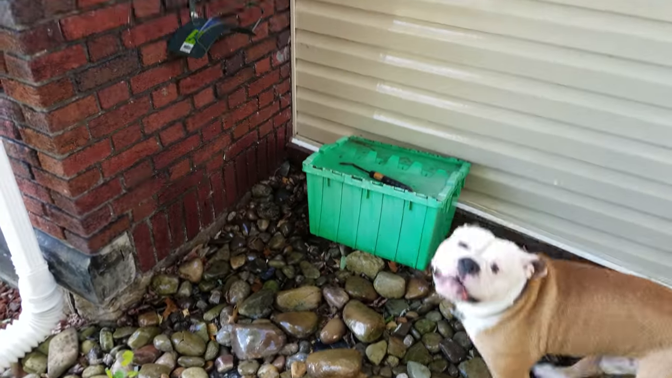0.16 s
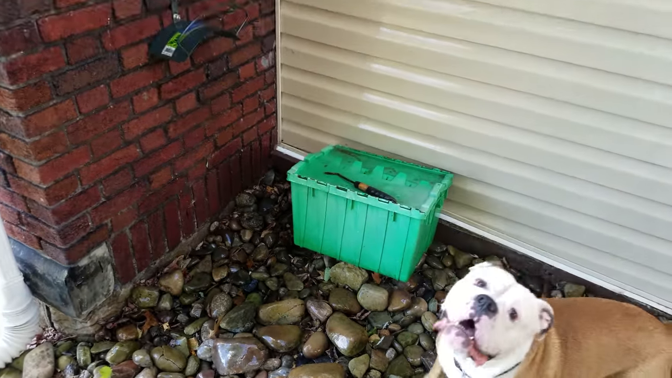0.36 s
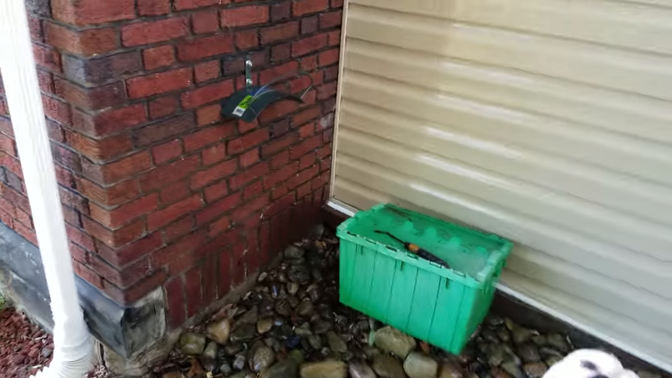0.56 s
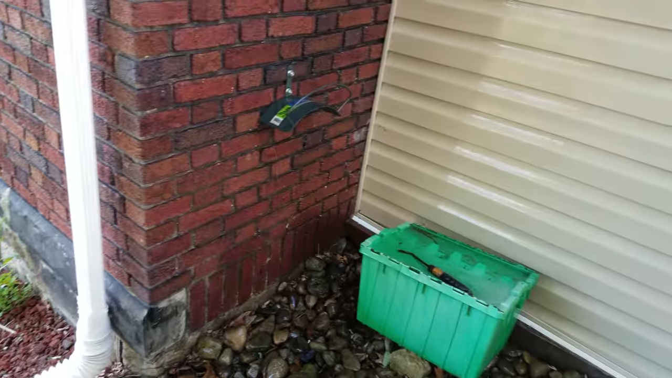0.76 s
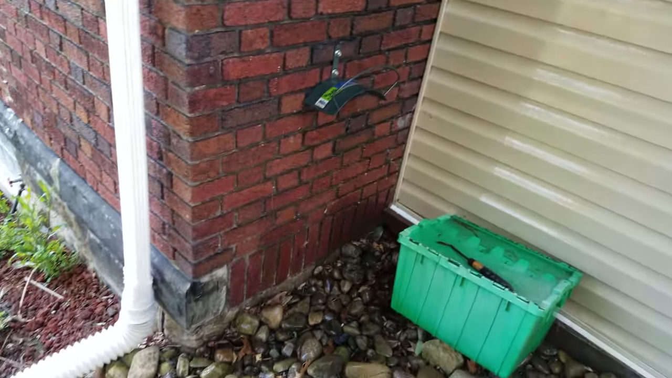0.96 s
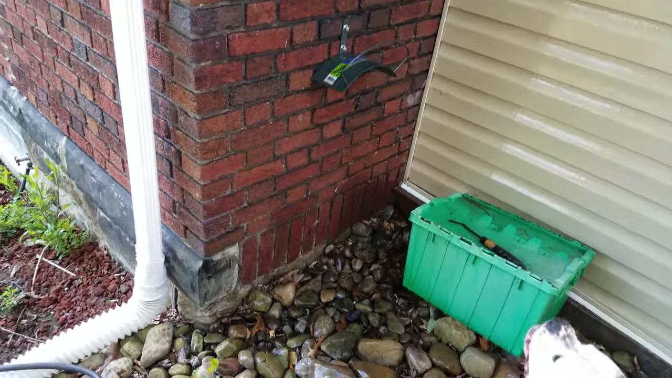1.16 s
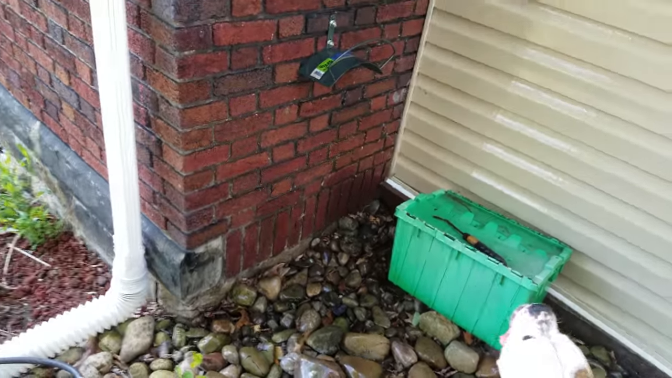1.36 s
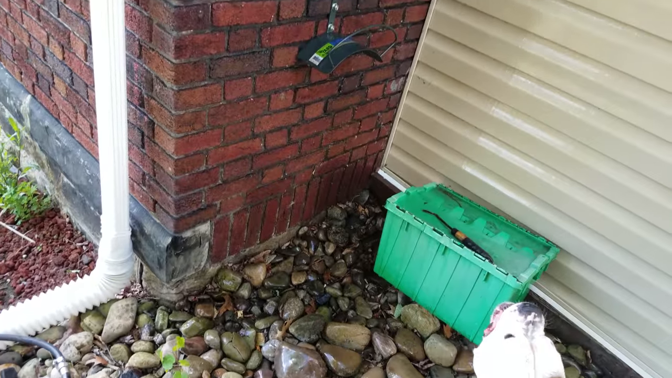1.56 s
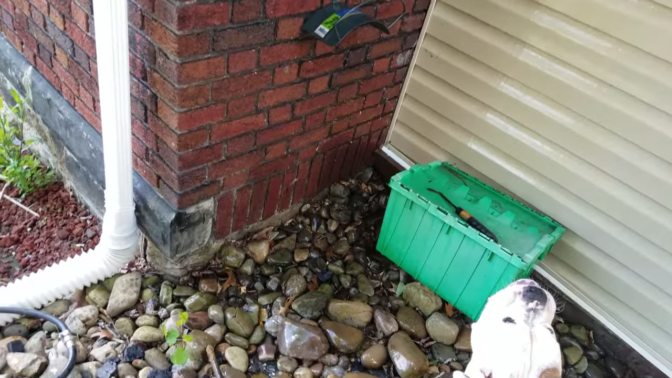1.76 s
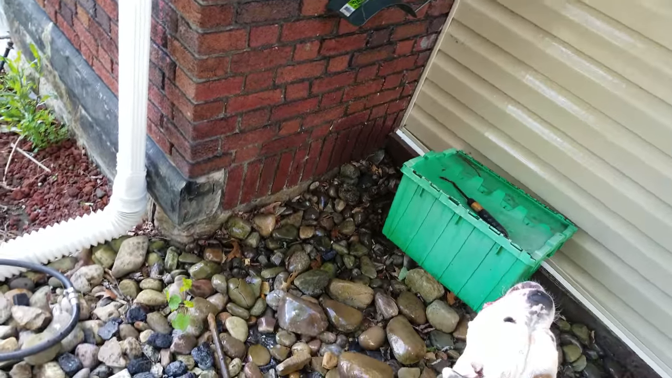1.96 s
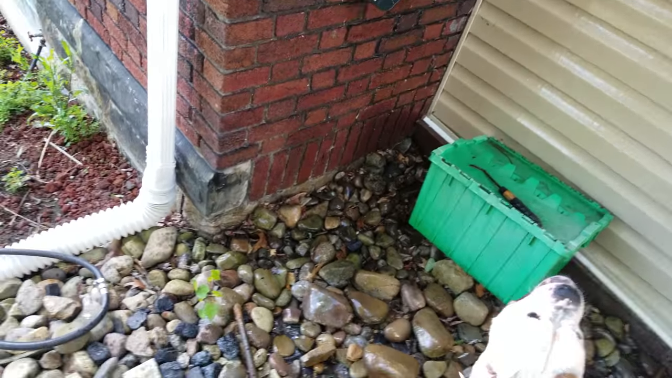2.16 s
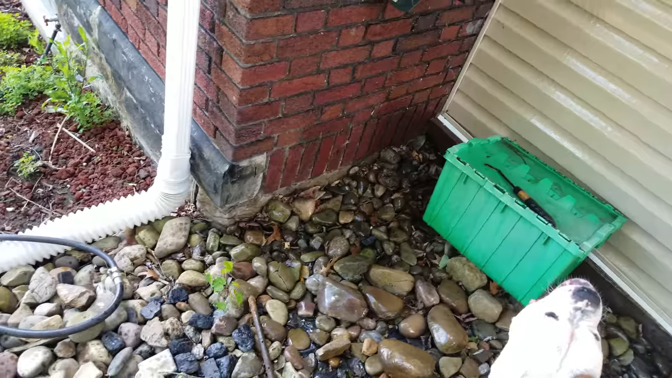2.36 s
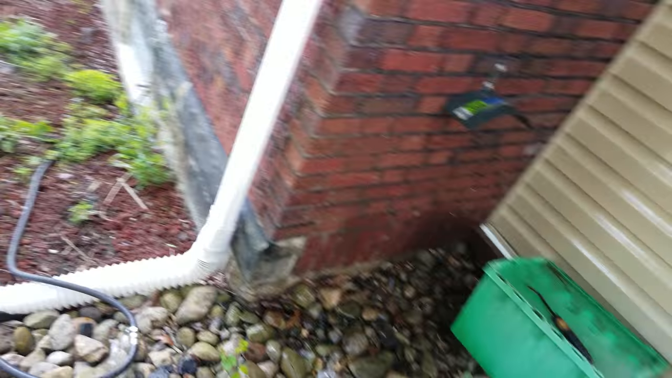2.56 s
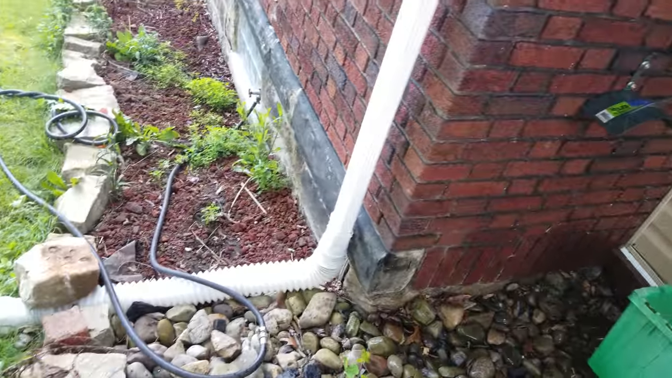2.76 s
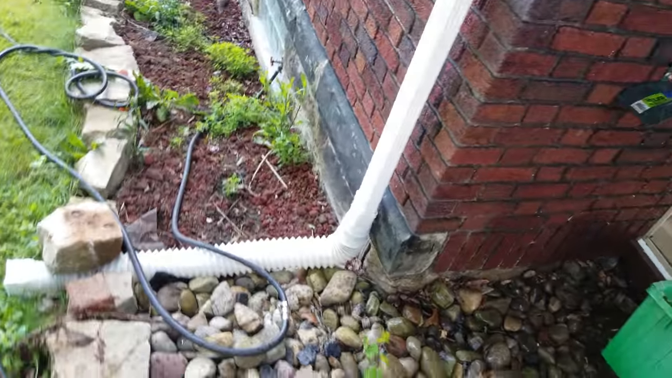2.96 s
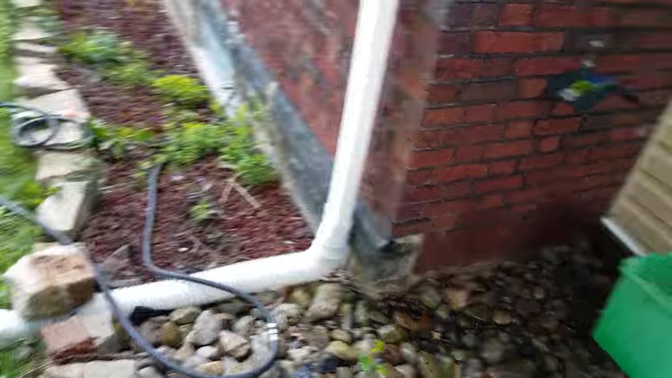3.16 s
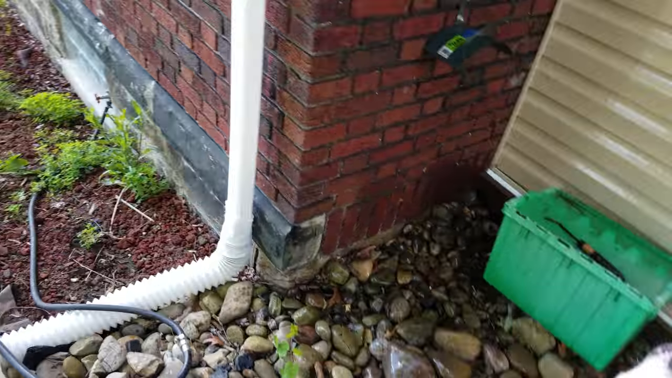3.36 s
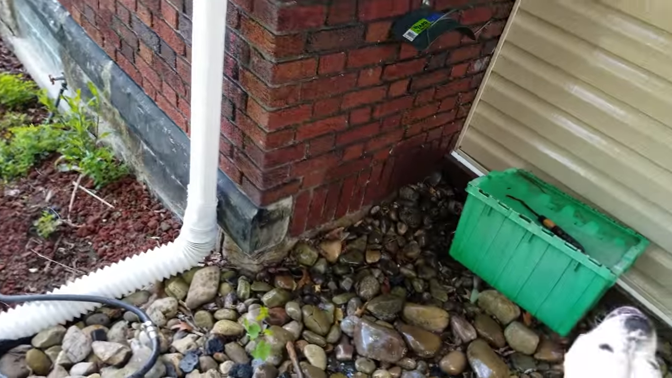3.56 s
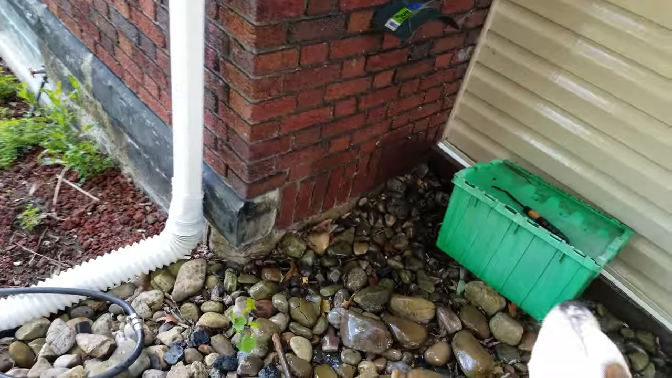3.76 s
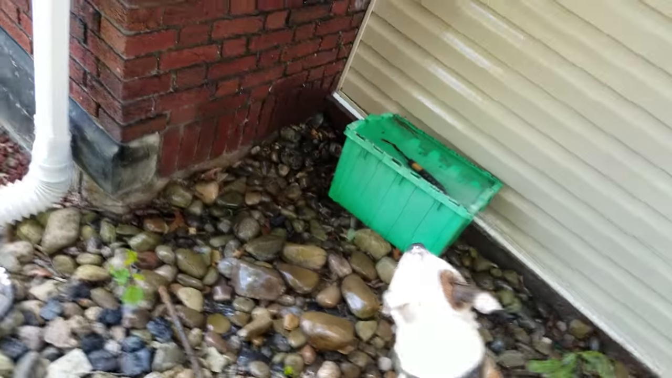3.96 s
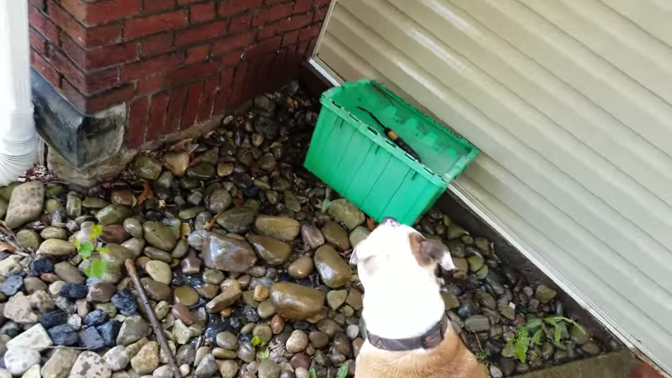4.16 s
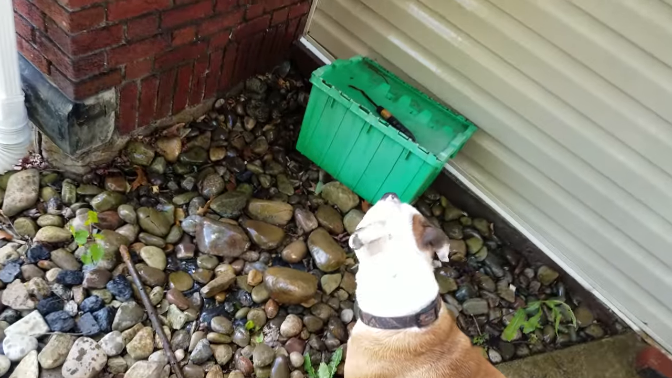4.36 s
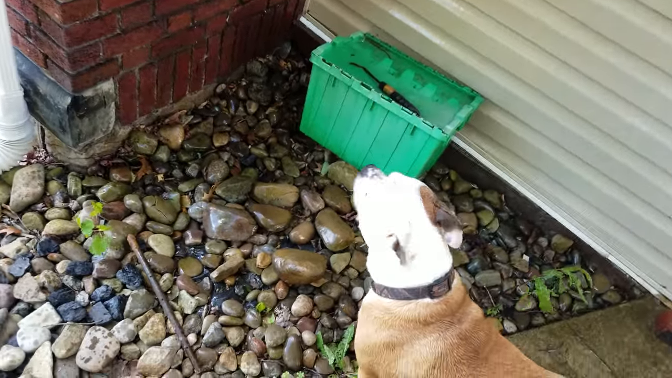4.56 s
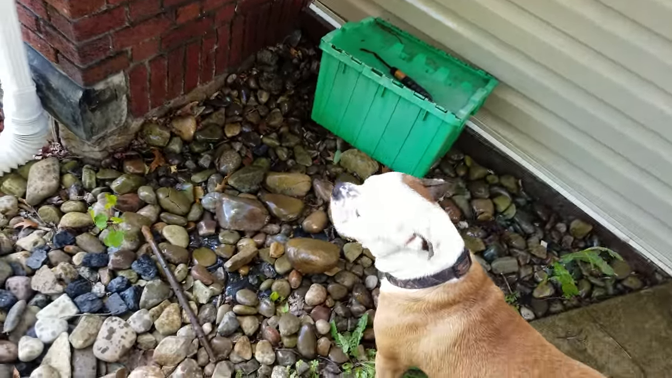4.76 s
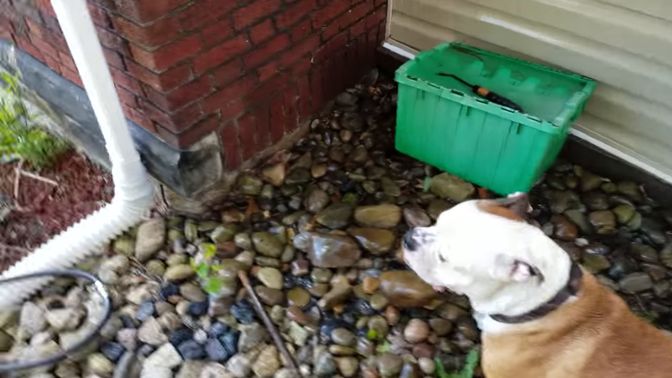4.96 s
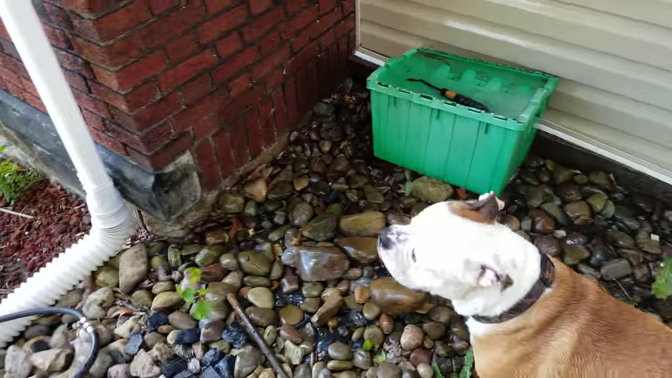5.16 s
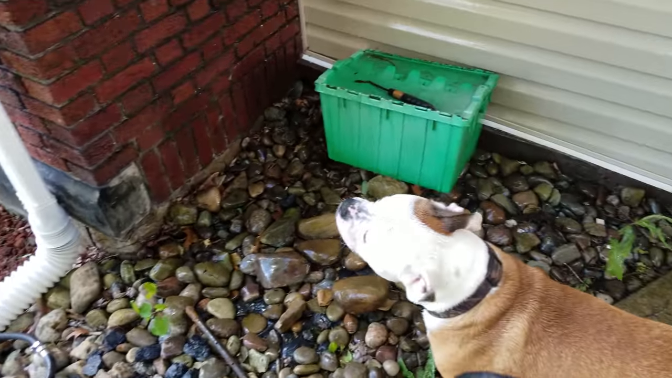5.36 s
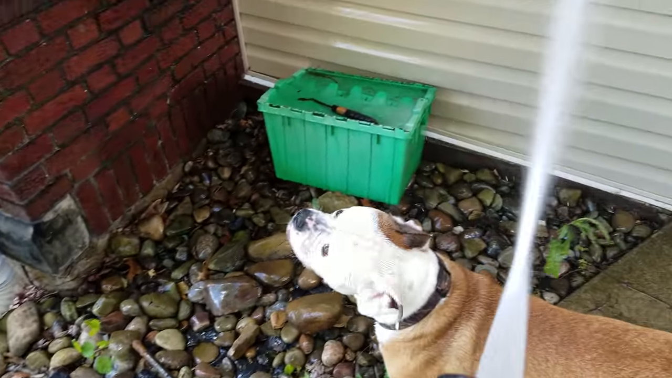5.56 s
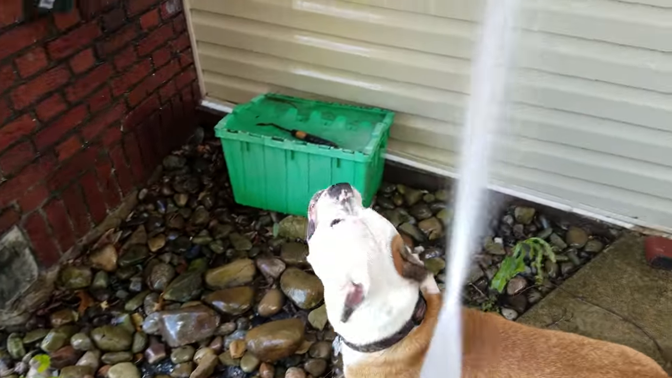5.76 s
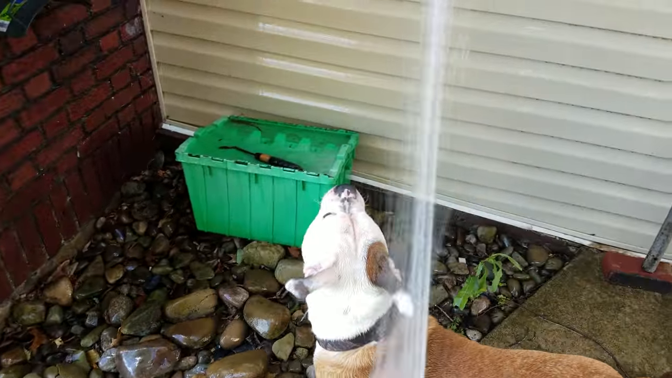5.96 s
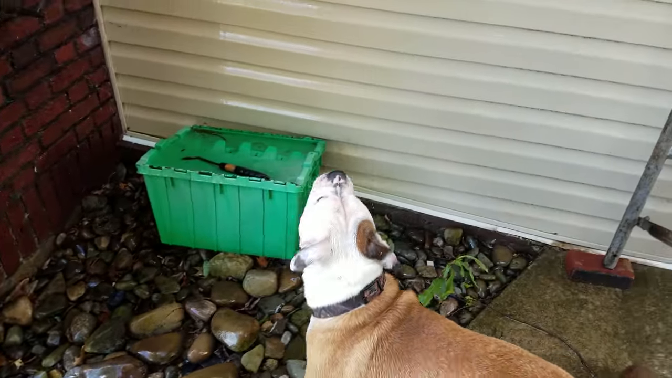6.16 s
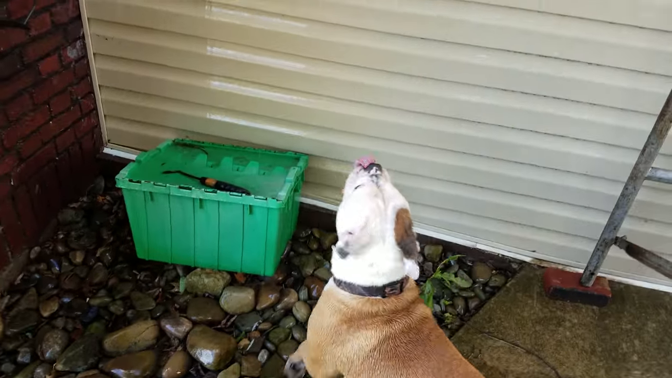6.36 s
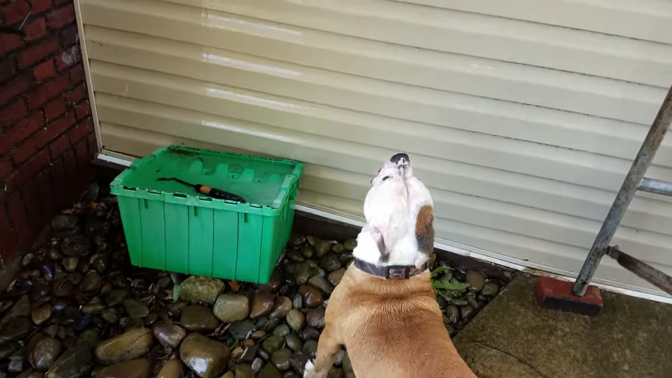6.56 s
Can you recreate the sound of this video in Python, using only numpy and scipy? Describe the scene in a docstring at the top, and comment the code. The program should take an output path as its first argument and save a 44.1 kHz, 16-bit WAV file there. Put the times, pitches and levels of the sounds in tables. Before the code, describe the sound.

Outdoors on wet pebbles by a house wall, close in stereo, over a soft airy background and an uneven low rumble. At the start a water jet is already drumming on hollow siding, fading by about 0.3 seconds. Pebbles knock, drops tick, and small metal collar tags jingle around 0.35 and 0.6-0.7. At 0.8 a valve spits and a bright, wide spray hisses until 1.5, thinning while its hollow nozzle note sinks, then shuts with a spit and a patter of falling drops until 1.8. From 2 to 5.3 it is quiet: sparse drips, stones shifting, soft footfalls and faint falling chirps from a distant bird. At about 5.4 a stronger jet swells, drumming and slapping resonantly on the panels with splash and mist, and stops abruptly near 6.1. Drops patter, a tiny thin whistle sounds near 6.2, then thuds, a faint tag jingle and plops end it.

```python
"""Beside a house wall, on wet pebbles: a garden hose is fired in short bursts while a dog waits.
Filtered random impacts make the nozzle's hiss, the jet's splash and the patter of falling drops.
The jet also drives resonances of the hollow siding. Decaying sines and noise make jingling collar tags,
knocking pebbles, footfalls and plops. A far bird chirps in swept sines; filtered noise makes a low
rumble that swells and fades."""
import sys
import numpy as np
from scipy import signal
from scipy.fft import rfft, irfft, next_fast_len
from scipy.io import wavfile

SR = 44100
rng = np.random.default_rng(int(sys.argv[2]) if len(sys.argv) > 2 else 0)


def unload_wav(signal):
    """Save mono or channel-first audio to the path in sys.argv[1] as 16-bit WAV at rate SR, clipped to [-1, 1]."""
    wavfile.write(
        sys.argv[1],
        SR,
        np.round(np.clip(np.atleast_2d(signal).T, -1, 1) * 32767).astype(np.int16),
    )


N = 291060
TIME = np.arange(N) / SR
SHORT_N = SR // 4  # samples in each short sound: a quarter second
SHORT_TIME = TIME[:SHORT_N]

# All levels in tables are relative: each source adds its own gain.
# outdoor background, low rumble spectra: freq_hz, density_db
AIR_COLOUR = [(88, -16), (150, -6), (201, -4), (286, -4.5), (341, -1), (524, -1), (566, -5), (649, -4),
              (1080, -9), (2650, -9.5), (3490, -15.5), (4580, -10), (7470, -27.5), (13400, -22.5),
              (16000, -28)]
RUMBLE_COLOUR = [(20, -20), (45, 0.5), (90, 2), (140, 3), (230, -5.5), (400, -4.5), (1000, -67)]
# background stereo width: freq_hz, side_minus_mid_db
AIR_SIDE = [(60, -0.5), (110, 0), (200, -3), (380, -6), (700, -6.5), (1290, -2.5), (2380, 4), (4400, 0),
            (8120, 0), (15000, -0.5)]
# low rumble swelling and fading, from breeze, handling or the jet, bell-shaped:
# peak_s, half_length_s (to 1/e), level_db
RUMBLE_SWELLS = [(0.37, 0.047, -46.5), (0.914, 0.034, -46), (1.32, 0.3, -48), (1.832, 0.15, -51.5),
                 (2.48, 0.13, -52), (2.98, 0.053, -49), (5.345, 0.38, -54), (5.59, 0.032, -45.5),
                 (6.098, 0.13, -47), (6.37, 0.19, -42)]
# narrow jet on the siding: start_s, end_s, drum_db, splash_db, mist_db, sag_db_per_s, release_db_per_s
JETS = [(-0.19, 0.269, -20.5, -33.5, -25.5, 50.5, 112), (5.426, 6.107, -16.5, -23.5, -23.5, 13, 448)]
# jet spectrum: freq_hz, density_db
JET_COLOUR = [(650, -18), (1100, -0.5), (1260, -5), (1390, 2), (2350, -3.5), (3030, -5.5), (3390, -8.5),
              (4150, -8.5), (4850, -8.5), (7490, -24), (11100, -20), (14900, -19), (15800, -17)]
# jet stereo width: freq_hz, side_minus_mid_db
JET_SIDE = [(60, -2), (110, -6), (200, -48), (380, -11), (700, -12.5), (1290, -3), (2380, 1.5),
            (4400, -1.5), (8120, 0.5), (15000, 0.5)]
# panel resonances where each burst lands, one list per jet: freq_hz, width_hz, level_db
SIDING_MODES = [
    [(318, 73, -5), (400, 97, 0), (528, 100, 1), (552, 83, -2), (646, 136, -1), (893, 66, -5.5),
     (1033, 105, -6)],
    [(186, 20, -17), (278, 27, -5.5), (327.7, 22.4, 1), (452, 123, 1.5), (504, 114, -7.5), (642, 110, 3),
     (734, 83, 4), (825, 77, 2.5), (947, 27, 3.5), (1030, 39, -0.5), (1400, 59, -23)],
]
# slugs of water slapping the siding: time_s, level_db
SLAPS = [(5.579, -13), (5.597, 4), (5.716, -3), (5.749, -15), (5.821, 2.5), (6.089, -11)]
# pebbles shifting under a foot: start_s, end_s, level_db
SHUFFLES = [(0.235, 0.324, -42), (2.702, 2.945, -46), (3.177, 3.237, -47.5), (3.605, 3.8, -45.5),
            (4.547, 4.595, -46)]
# pebbles knocking underfoot: time_s, level_db, ring_hz
PEBBLES = [(0.331, -23, 1350), (0.502, -32, 1236), (1.79, -28, 1010), (3.506, -23.5, 1250),
           (3.797, -29, 1190), (3.875, -27.5, 1276), (4.0, -24, 1404), (4.086, -29.5, 755),
           (4.578, -31, 726), (5.001, -38.5, 861)]
# pebble spectrum: freq_hz, density_db
PEBBLE_COLOUR = [(150, -1), (300, 0), (1100, 3.5), (2000, -2.5), (3000, -7.5), (3700, -10), (5200, -12),
                 (8000, -34)]
# soft footfalls: time_s, level_db, ring_hz
THUDS = [(0.349, -25, 558), (1.295, -22.5, 335), (1.703, -21.5, 203), (2.565, -32, 414), (3.012, -27, 174),
         (4.448, -34, 130), (6.274, -24.5, 240), (6.395, -33, 92), (6.451, -30, 115), (6.54, -30, 276)]
# footfall scuff spectrum: freq_hz, density_db
SCUFF_COLOUR = [(100, -44), (250, 31), (600, 12), (1200, -24), (4000, -40)]
# early echoes from ground and house walls: left_delay_s, right_delay_s, level_db
ECHOES = [(.0083, .0076, -18), (0.0119, .0139, -22)]
# water falling back on the pebbles: start_s, end_s, level_db
SHOWERS = [(0.339, 0.353, -54.5), (1.51, 1.745, -50.5), (1.762, 1.83, -49), (6.118, 6.7, -51)]
# shower spectrum: freq_hz, density_db
SHOWER_COLOUR = [(180, -26), (300, 2), (528, 4), (689, -1), (1030, 1.5), (1460, -7.5), (2070, -4),
                 (3080, -10.5), (3400, -6), (5700, -8.5), (7820, -19), (10600, -8), (16000, -8)]
# collar tags touching: time_s, level_db
JINGLES = [(0.35, -22), (0.618, -21), (0.635, -21), (0.6563, -15.5), (0.7005, -20.5), (6.534, -30)]
# collar tag modes: freq_hz, level_db, t60_s
TAG_MODES = [(11950, -20, .03), (13300, -8, .045), (14250, -9, .06), (15000, 0, .075)]
# trigger valve spitting as it opens and shuts: time_s, level_db, attack_s, t60_s
VALVE_SPITS = [(0.78, -10, 0.007, 0.048), (1.505, -10.5, 0.009, 0.052), (5.428, -22.5, 0.03, 0.15)]
# valve spit spectrum: freq_hz, density_db
SPIT_COLOUR = [(2000, -17.5), (5000, -10.0), (7500, -10.5), (11000, -5), (16000, 1.5)]
# single drops close by: time_s, level_db
DRIPS = [(0.3878, -25.5), (0.501, -30), (0.5433, -25.5), (1.767, -25.5), (2.103, -30), (2.803, -34),
         (3.065, -36), (3.255, -38), (3.507, -22), (3.646, -37), (3.9976, -30), (4.339, -35), (6.232, -26),
         (6.3844, -23), (6.564, -25.5)]
# drop spectrum, also used for the tag tick: freq_hz, density_db
DRIP_COLOUR = [(1500, -38), (2800, 2), (3600, 2.5), (5200, 0.5), (7500, -5.5), (10500, 0), (16000, -1)]
# wide spray spectrum: freq_hz, density_db
SPRAY_COLOUR = [(120, -45), (200, -16), (240, -10.5), (401, -4), (693, -9), (1080, -9), (1670, -9.5),
                (2360, -8.5), (2780, -2.5), (3730, 0.5), (5890, -3), (7740, -8.5), (10800, -3), (15000, -2),
                (15800, -6.5)]
# spray stereo width: freq_hz, side_minus_mid_db
SPRAY_SIDE = [(60, -1), (110, -1), (200, -6), (380, -10), (700, -5), (1290, 0.5), (2380, 4.5), (4400, -8.5),
              (8120, 2), (15000, -0.5)]
# nozzle's hollow note, sinking as the trigger is let go: time_s, pitch_hz
NOZZLE_NOTE = [(0.8, 3175), (1.2, 2950), (1.36, 2812), (1.45, 2270), (1.5, 2000)]
# far bird: time_s, level_db
CHIRPS = [(2.245, -41.5), (2.88, -48), (3.32, -45), (3.78, -44.5), (4.38, -50.5), (5.239, -48)]
# shape of one chirp: offset_s (from time_s), pitch_hz, level_db
CHIRP_SHAPE = [(-.025, 4850, -9), (0.005, 4950, 5.5), (0.03, 4960, -1), (0.06, 4650, -6), (0.105, 4200, 1),
               (0.135, 3770, -20)]
# drops plopping into puddles between the stones: time_s, level_db, pitch_hz
PLOPS = [(6.522, -40, 1093), (6.575, -37, 830)]
# peaks and dips of the two microphone ports: freq_hz, width_hz, gain_db
LEFT_PORT = [(70, 79, -5), (677, 2100, -0.5), (2935, 1280, 7.5), (3650, 1160, -8), (5760, 1900, 3),
             (7930, 2320, -7.5), (10830, 3300, 5.5)]
RIGHT_PORT = [(72, 78, 3), (2500, 2840, -4), (5180, 2270, -9), (10100, 1100, 3)]

ONSET_DB = 24  # swell of every flow during its attack
RUMBLE_FLOOR_DB, AIR_START_DB = -56, -49.5  # rumble between swells; background at time zero
AIR_RISE_DB_PER_S = 0.2836
JET_FLIGHT_S, JET_ATTACK_S = 0.093, 0.16  # jet reaches the panels; jet at full force
SHUFFLE_ATTACK_S, SHUFFLE_RELEASE_DB_PER_S = 0.017, 130
SHOWER_ATTACK_S, SHOWER_RELEASE_DB_PER_S = 0.0076, 117
# trigger squeezed, eased off, nearly closed, let go
SPRAY_OPEN_S, SPRAY_EASE_S, SPRAY_CHOKE_S, SPRAY_SHUT_S = 0.782, 0.95, 1.38, 1.491
SPRAY_ATTACK_S, SPRAY_RELEASE_DB_PER_S = 0.019, 446
WHISTLE_START_S, WHISTLE_END_S, WHISTLE_HZ, WHISTLE_DB = 6.18, 6.258, 4150, -43
CUTOFF_HZ = 15850


def from_db(db):
    """Decibels to amplitude ratio."""
    return 10 ** (np.asarray(db) / 20)


def at_hz(points, hz):
    """Read a spectrum on a log-frequency axis."""
    point_hz, value = np.transpose(points)
    return np.interp(np.log(np.maximum(hz, 1)), np.log(point_hz), value)


def after(s):
    """Seconds gone by since a moment, zero before it."""
    return np.maximum(TIME - s, 0)


def flow(start_s, end_s, attack_s, release_db_per_s, sag_db_per_s=0):
    """Flow envelope: swells to full level, sags while it lasts, dies away after its end."""
    rise = np.clip((TIME - start_s) / attack_s, 0, 1)
    swell_db = ONSET_DB * (rise - 1)
    sag_db = sag_db_per_s * after(start_s + attack_s)
    release_db = release_db_per_s * after(end_s)
    return (TIME >= start_s) * from_db(np.maximum(swell_db - sag_db - release_db, -200))


def drift(rate_hz):
    """Slow random wander with spread 1: low-passed noise drawn every 40 samples."""
    r = np.exp(-80 * np.pi * rate_hz / SR)
    noise = rng.standard_normal(N // 40 + 2002)
    slow = signal.lfilter([1], [1, -2 * r, r * r], noise)[2000:]  # filter settled
    return np.interp(np.arange(N) / 40, np.arange(len(slow)), slow / slow.std())


def band(x, low_hz, high_hz):
    """Second-order band-pass."""
    sos = signal.butter(2, [low_hz, min(high_hz, .47 * SR)], "band", fs=SR, output="sos")
    return signal.sosfilt(sos, x + 1e-18)


def shaped(x, colour):
    """Give a steady sound a spectrum that falls away below its lowest point."""
    size = next_fast_len(N)
    hz = np.arange(size // 2 + 1) * SR / size
    gain = from_db(at_hz(colour, hz)) * np.minimum(hz / colour[0][0], 1) ** 2
    return irfft(rfft(x, size) * gain, size)[..., :N]


def widen(pair, side_db):
    """Two unrelated sounds, as mid and side, become left and right."""
    side = shaped(pair[1], [(1, 0)] + list(side_db))
    return np.array([pair[0] + side, pair[0] - side])


def unit(x, low_hz, high_hz):
    """Scale so that the mid has rms 1 between two frequencies."""
    size = next_fast_len(N)
    first, last = int(low_hz * size / SR), int(high_hz * size / SR)
    power = np.abs(rfft(x.mean(0), size)[first:last]) ** 2
    return x / np.sqrt(2 * power.sum() / size / N)


def pan(x, left_db):
    """Raise the left side and lower the right."""
    return x * from_db([[left_db], [-left_db]])


def add(out, s, sound):
    """Mix a short sound in at a time."""
    start = max(int(s * SR), 0)
    out[:, start:start + sound.shape[-1]] += sound[..., :N - start]


def dying(t60_s):
    """A quarter second of exponential decay."""
    return from_db(-60 * SHORT_TIME / t60_s)


def grit(colour, width):
    """A quarter second of coloured stereo noise, mid rms 1."""
    gain = from_db(at_hz(colour, np.arange(SHORT_N // 2 + 1) * SR / SHORT_N))
    mid, side = irfft(rfft(rng.standard_normal((2, SHORT_N))) * gain, SHORT_N)
    return np.array([mid + width * side, mid - width * side]) / mid.std()


def drops(per_s, spread_db):
    """Two trains of random impacts of uneven size, rms 1."""
    sizes = from_db(spread_db * np.minimum(rng.exponential(1, (2, N)), 4))
    signs = rng.choice([-1, 1], (2, N))
    clicks = sizes * signs * (rng.random((2, N)) < per_s / SR)
    return clicks / clicks.std()


def stream(colour, side_db, per_s, spread_db, edges_hz):
    """Countless drops heard in one frequency range, in stereo, mid rms 1 there."""
    low_hz, high_hz = edges_hz
    water = widen(shaped(drops(per_s, spread_db), colour), side_db)
    return unit(band(water, low_hz, high_hz), low_hz, high_hz)


def outdoors(lumps_db=2.5, trickle_db=-11, left_db=1.0):
    """Slowly growing background with water trickling off the wall; lumpy low rumble."""
    grain = rng.standard_normal((2, N)) + from_db(trickle_db) * drops(per_s=110, spread_db=-2.0)
    air = pan(unit(widen(shaped(grain, AIR_COLOUR), AIR_SIDE), 300, 3000), left_db)
    lumps = shaped(rng.standard_normal((2, N)), RUMBLE_COLOUR) * from_db(lumps_db * drift(7.6))
    rumble = unit(widen(lumps, AIR_SIDE), 25, 130)
    swells = sum(from_db(db) * np.exp(-((TIME - s) / half_s) ** 2) for s, half_s, db in RUMBLE_SWELLS)
    air_level = from_db(AIR_START_DB + AIR_RISE_DB_PER_S * TIME)
    return air_level * air + np.hypot(from_db(RUMBLE_FLOOR_DB), swells) * rumble


def resonate(x, hz, width_hz):
    """Two-pole resonance, peak gain 1."""
    r = np.exp(-np.pi * width_hz / SR)
    zeros = np.array([1, 0, -1]) * (1 - r * r) / 2
    poles = [1, -2 * r * np.cos(2 * np.pi * hz / SR), r * r]
    return signal.lfilter(zeros, poles, x + 1e-18)


def siding(blows, modes):
    """Hollow panels ring in a few resonances, summed with alternating sign."""
    ring = sum((-1) ** k * from_db(db) * resonate(blows, hz, width_hz)
               for k, (hz, width_hz, db) in enumerate(modes))
    return band(ring, 95, 2500)


def jet(lumps_db=1.5, mist_lumps_db=1.13, slap_db=2.5, slap_t60_s=0.07, splash_attack_s=0.14,
        splash_sag_db_per_s=5, drum_left_db=.5, mist_left_db=-0.96):
    """The jet breaks into slugs that drum on the siding and burst into splash and mist."""
    lumps = drift(72)
    drumming, spatter = 0, 0
    coarse = stream(JET_COLOUR, JET_SIDE, per_s=3500, spread_db=1.0, edges_hz=(1150, 6500))
    fine = stream(JET_COLOUR, JET_SIDE, per_s=12000, spread_db=3.0, edges_hz=(8800, 19000))
    for (start, end, drum_db, splash_db, mist_db, sag, release), modes in zip(JETS, SIDING_MODES):
        blows = drops(per_s=1800, spread_db=3.0) * from_db(lumps_db * lumps)
        panel = unit(widen(siding(blows, modes), JET_SIDE), 250, 1200)
        force = flow(start + JET_FLIGHT_S, end, JET_ATTACK_S - JET_FLIGHT_S, release, sag)
        drumming = drumming + from_db(drum_db) * force * panel
        # splash builds up sooner than mist and thins out faster
        splash = flow(start, end, splash_attack_s, release, sag + splash_sag_db_per_s)
        mist = flow(start, end, JET_ATTACK_S, release, sag)
        spatter = spatter + from_db(splash_db) * splash * coarse + from_db(mist_db) * mist * fine
    slaps = np.zeros((1, N))
    for s, db in SLAPS:
        add(slaps, s, from_db(db + slap_db) * dying(slap_t60_s) * rng.standard_normal(SHORT_N))
    drumming = drumming + siding(slaps, SIDING_MODES[1])
    # slugs that drum also throw up spatter
    spatter = spatter * from_db(mist_lumps_db * lumps)
    return pan(drumming, drum_left_db) + pan(spatter, mist_left_db)


def falling_water():
    """Relative amount of thrown water coming down at each moment."""
    return sum(from_db(db) * flow(start, end, SHOWER_ATTACK_S, SHOWER_RELEASE_DB_PER_S)
               for start, end, db in SHOWERS)


def stray_drips(count=50, faint_db=-49, over_shower_db=11, spread_db=9, t60_s=0.03):
    """Drops fall at random: faint ones off the wet wall, heavier ones during a shower."""
    out = np.zeros((2, N))
    level = np.hypot(from_db(faint_db), from_db(over_shower_db) * falling_water())
    for when, smallness in rng.random((count, 2)):
        i = int(when * N)
        size = level[i] * from_db(-spread_db * smallness)
        add(out, TIME[i], size * dying(t60_s) * grit(DRIP_COLOUR, width=1.0))
    return out


def shuffles(level_db=-2):
    """Small stones grind over each other as the weight shifts: dense random impacts."""
    level = sum(from_db(db) * flow(start, end, SHUFFLE_ATTACK_S, SHUFFLE_RELEASE_DB_PER_S)
                for start, end, db in SHUFFLES)
    grind = widen(shaped(drops(per_s=2500, spread_db=1.0), PEBBLE_COLOUR), AIR_SIDE)
    return from_db(level_db) * level * unit(grind, 500, 2200)


def steps(knock_db=-9, ring_db=-9, knock_t60_s=0.12, ring_t60_s=0.083, thud_db=-3, thud_t60_s=0.057,
          thud_rise_s=0.00052, scuff_db=-11):
    """Pebbles crunch together with a short ring; the ground gives a soft thud and a dull scuff."""
    out = np.zeros((2, N))
    for s, db, hz in PEBBLES:
        crunch = from_db(knock_db) * dying(knock_t60_s) * grit(PEBBLE_COLOUR, width=0.47)
        ring = from_db(ring_db) * dying(ring_t60_s) * np.sin(2 * np.pi * hz * SHORT_TIME)
        add(out, s, from_db(db) * (crunch + ring))
    for s, db, hz in THUDS:
        scuff = from_db(scuff_db) * grit(SCUFF_COLOUR, width=0.8)
        thud = np.sin(2 * np.pi * hz * SHORT_TIME)
        envelope = dying(thud_t60_s) * (1 - np.exp(-SHORT_TIME / thud_rise_s))
        add(out, s, from_db(db + thud_db) * envelope * (thud + scuff))
    return out


def walls(x):
    """The corner of the house adds early echoes; total power stays about the same."""
    out = x.copy()
    for left_s, right_s, db in ECHOES:
        for side, s in enumerate((left_s, right_s)):
            lag = int(s * SR)
            out[side, lag:] += from_db(db) * x[side, :N - lag]
    return out / np.sqrt(1 + sum(from_db(db) ** 2 for _, _, db in ECHOES))


def showers(level_db=-1, clumps_db=1.8):
    """Thrown water patters down on the stones in clumps: random impacts of wandering level."""
    patter = widen(shaped(drops(per_s=3500, spread_db=3.5), SHOWER_COLOUR), AIR_SIDE)
    patter = unit(patter * from_db(clumps_db * drift(30)), 9000, 12500)
    return from_db(level_db) * falling_water() * patter


def tags(ring_db=-6, ring_spread_db=1.2, tick_db=-21, tick_t60_s=0.048):
    """Small metal tags touch: a tick, then every mode rings with a strength of its own."""
    out = np.zeros((2, N))
    lag_cycles = np.array([[0], [.25]])  # left, right
    for s, db in JINGLES:
        ring = 0
        for hz, mode_db, t60_s in TAG_MODES:
            strength = from_db(mode_db + rng.normal(0, ring_spread_db))
            cycles = hz * SHORT_TIME + rng.random() + lag_cycles
            ring = ring + strength * dying(t60_s) * np.sin(2 * np.pi * cycles)
        tick = from_db(tick_db) * dying(tick_t60_s) * grit(DRIP_COLOUR, width=0.97)
        add(out, s, from_db(db) * (from_db(ring_db) * ring + tick))
    return out


def spits_and_drips(valve_db=-6, drip_db=-8.5, drip_t60_s=0.039):
    """Short bright noise bursts: the valve spitting, single drops bursting on stone."""
    out = np.zeros((2, N))
    for s, db, attack_s, t60_s in VALVE_SPITS:
        attack = np.minimum(SHORT_TIME / attack_s, 1)
        decay = from_db(-60 * np.maximum(SHORT_TIME - attack_s, 0) / t60_s)
        add(out, s, from_db(db + valve_db) * attack * decay * grit(SPIT_COLOUR, width=1.0))
    for s, db in DRIPS:
        add(out, s, from_db(db + drip_db) * dying(drip_t60_s) * grit(DRIP_COLOUR, width=1.0))
    return out


def spray_flow(sag_db_per_s, choke_db_per_s):
    """The spray holds, sags as the trigger eases and changes level as the valve narrows."""
    held = flow(SPRAY_OPEN_S, SPRAY_SHUT_S, SPRAY_ATTACK_S, SPRAY_RELEASE_DB_PER_S)
    return held * from_db(-sag_db_per_s * after(SPRAY_EASE_S) - choke_db_per_s * after(SPRAY_CHOKE_S))


def spray(hiss_db=-26, rush_db=-29.5, spatter_db=-30, flutter_db=0.4, left_db=0.03):
    """Water tears into fine drops at the nozzle: bright hiss, rush, and spatter where it lands."""
    # as the valve narrows the rush dies while the hiss holds up
    hiss = spray_flow(sag_db_per_s=9.5, choke_db_per_s=-15)
    rush = spray_flow(sag_db_per_s=9, choke_db_per_s=79)
    spatter = spray_flow(sag_db_per_s=13, choke_db_per_s=6)
    fine = stream(SPRAY_COLOUR, SPRAY_SIDE, per_s=26000, spread_db=5.5, edges_hz=(8800, 19000))
    middle = stream(SPRAY_COLOUR, SPRAY_SIDE, per_s=22000, spread_db=2.0, edges_hz=(3400, 6800))
    coarse = stream(SPRAY_COLOUR, SPRAY_SIDE, per_s=9000, spread_db=2.0, edges_hz=(200, 3500))
    water = from_db(hiss_db) * hiss * fine
    water = water + from_db(rush_db) * rush * middle
    water = water + from_db(spatter_db) * spatter * coarse
    return pan(water * from_db(flutter_db * drift(40)), left_db)


def nozzle(half_width_hz=520, level_db=-35.5, attack_s=0.18):
    """Turbulence rings in the nozzle's bore: low-passed noise shifted up around a gliding note."""
    level = flow(SPRAY_OPEN_S, SPRAY_SHUT_S, attack_s, SPRAY_RELEASE_DB_PER_S)
    low_pass = signal.butter(2, half_width_hz, fs=SR, output="sos")
    eddies = signal.sosfilt(low_pass, rng.standard_normal((2, 2, N)))
    pitch_hz = np.interp(TIME, *np.transpose(NOZZLE_NOTE))
    phase = 2 * np.pi * np.cumsum(pitch_hz) / SR
    note = eddies[0] * np.cos(phase) + eddies[1] * np.sin(phase)
    return from_db(level_db) * level * note / note.std()


def bird(buzz_depth_hz=330, scatter_t60_s=0.21, level_db=2, left_db=-0.5):
    """Rasping, falling chirps with random pitch buzz, smeared by walls and trees."""
    out = np.zeros(N)
    offset_s, pitch_hz, shape_db = np.transpose(CHIRP_SHAPE)
    buzz_hz = buzz_depth_hz * drift(295)
    for s, db in CHIRPS:
        span = (TIME > s + offset_s[0]) & (TIME < s + offset_s[-1])
        t = TIME[span] - s
        hz = np.interp(t, offset_s, pitch_hz) + buzz_hz[span]
        level = from_db(db + np.interp(t, offset_s, shape_db))
        out[span] += level * np.sin(2 * np.pi * np.cumsum(hz) / SR)
    echoes = rng.standard_normal((2, SHORT_N)) * dying(scatter_t60_s)
    smeared = signal.fftconvolve(out[None], echoes / np.linalg.norm(echoes[0]), axes=-1)[:, :N]
    return pan(from_db(level_db) * smeared, left_db)


def whistle(attack_s=0.028, release_db_per_s=160, waver_hz=12):
    """A thread of water sings through the shut valve: one wavering sine."""
    level = from_db(WHISTLE_DB) * flow(WHISTLE_START_S, WHISTLE_END_S, attack_s, release_db_per_s)
    return level * np.sin(2 * np.pi * np.cumsum(WHISTLE_HZ + waver_hz * drift(60)) / SR)


def plops(t60_s=0.058, rise_per_s=2.2):
    """A drop in a puddle traps a bubble whose pitch rises as it dies."""
    out = np.zeros((2, N))
    for s, db, hz in PLOPS:
        cycles = hz * SHORT_TIME * (1 + rise_per_s * SHORT_TIME / 2)
        add(out, s, from_db(db) * dying(t60_s) * np.sin(2 * np.pi * cycles))
    return out


def scene():
    """Water, dog, feet and garden."""
    water = spray() + nozzle() + jet() + showers() + plops() + spits_and_drips() + whistle()
    feet = walls(pan(steps(), left_db=1.0) + shuffles())
    return water + feet + pan(tags(), left_db=3.5) + bird() + outdoors() + stray_drips()


def port(x, peaks):
    """A microphone port colours the sound with a chain of peaks and dips."""
    for hz, width_hz, db in peaks:
        w, root = 2 * np.pi * hz / SR, from_db(db / 2)
        alpha = np.sin(w) * width_hz / hz / 2
        zeros = [1 + alpha * root, -2 * np.cos(w), 1 - alpha * root]
        poles = [1 + alpha / root, -2 * np.cos(w), 1 - alpha / root]
        x = signal.lfilter(zeros, poles, x)
    return x


def record(dry):
    """Two ports of different colour, then a steep top cut."""
    heard = np.array([port(dry[0], LEFT_PORT), port(dry[1], RIGHT_PORT)])
    top_cut = signal.ellip(12, .2, 80, CUTOFF_HZ, fs=SR, output="sos")
    return signal.sosfilt(top_cut, heard)


dry = scene()
out = record(dry)
unload_wav(out)
```